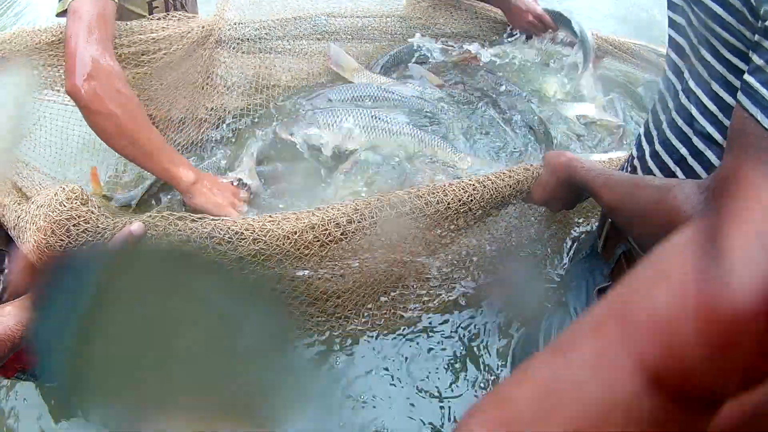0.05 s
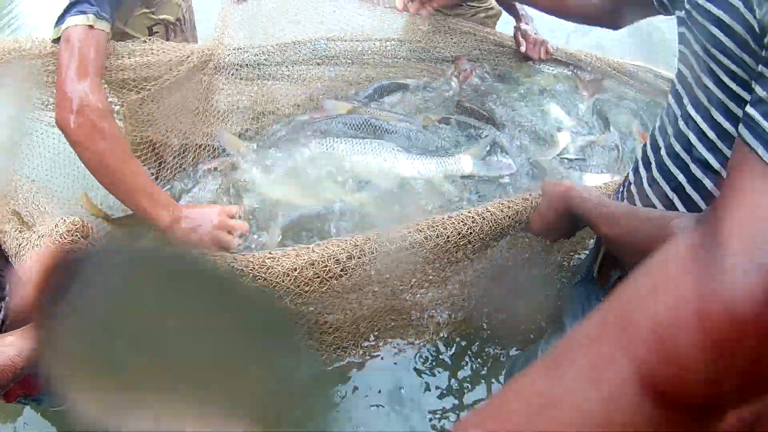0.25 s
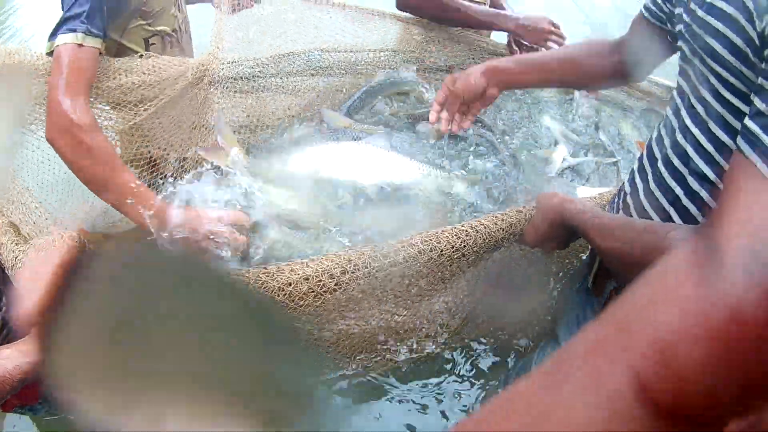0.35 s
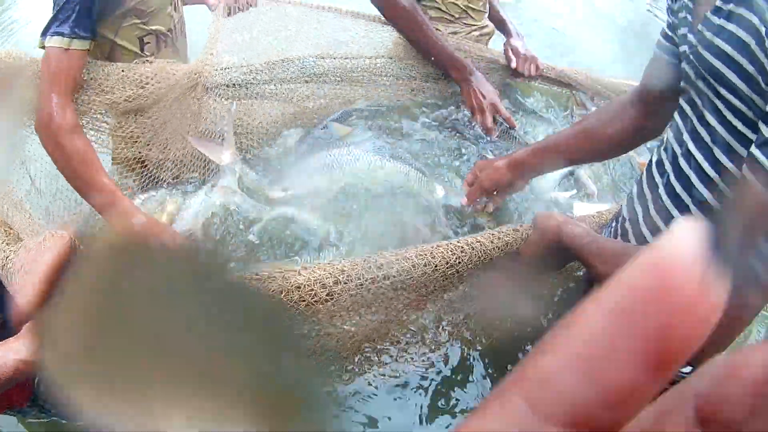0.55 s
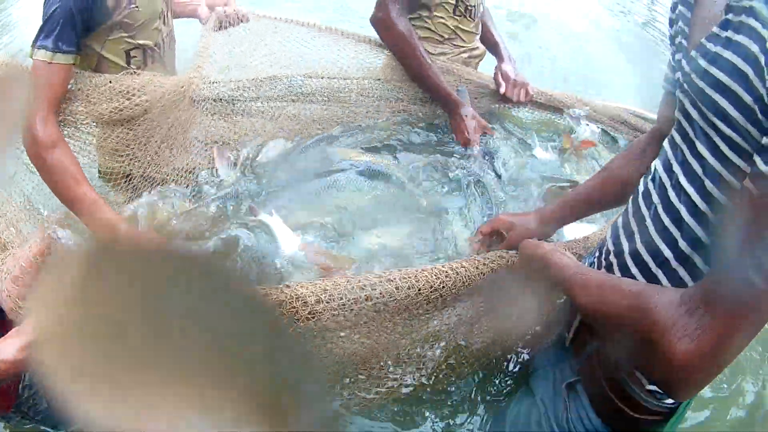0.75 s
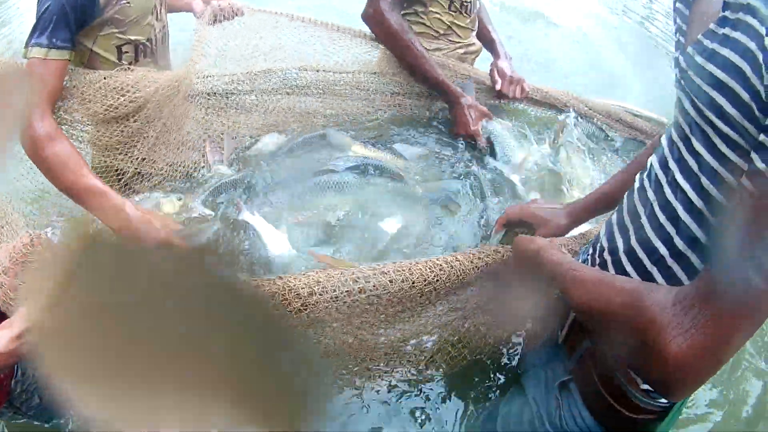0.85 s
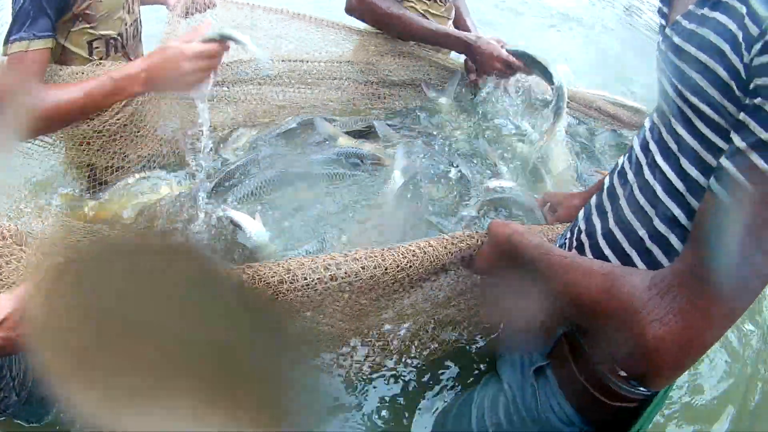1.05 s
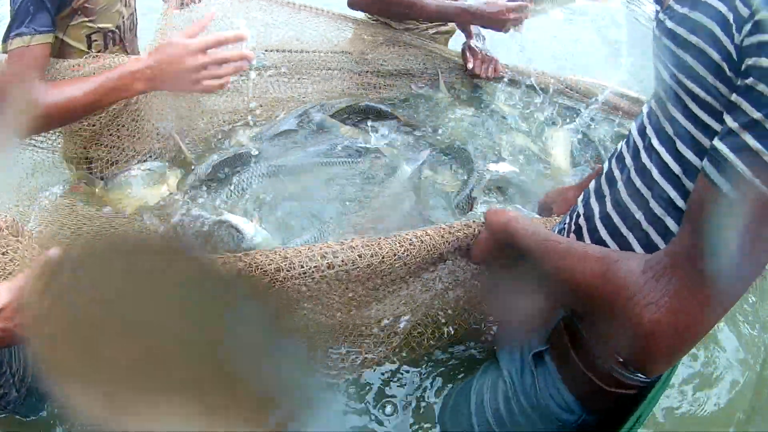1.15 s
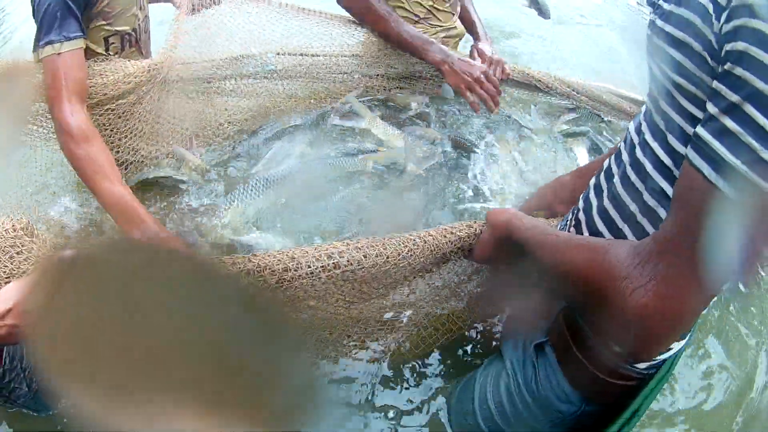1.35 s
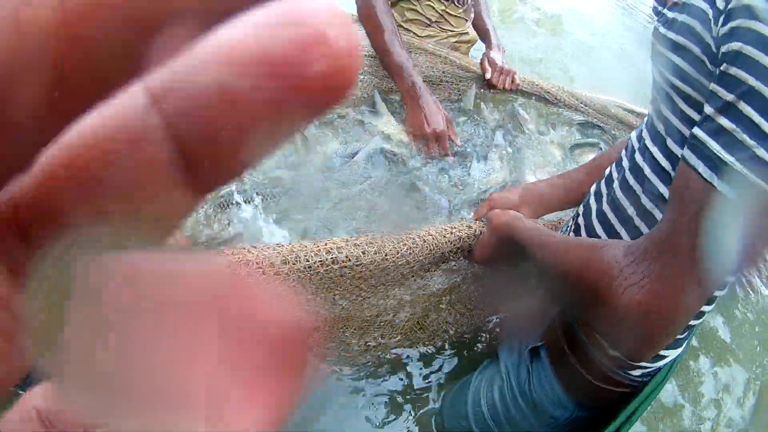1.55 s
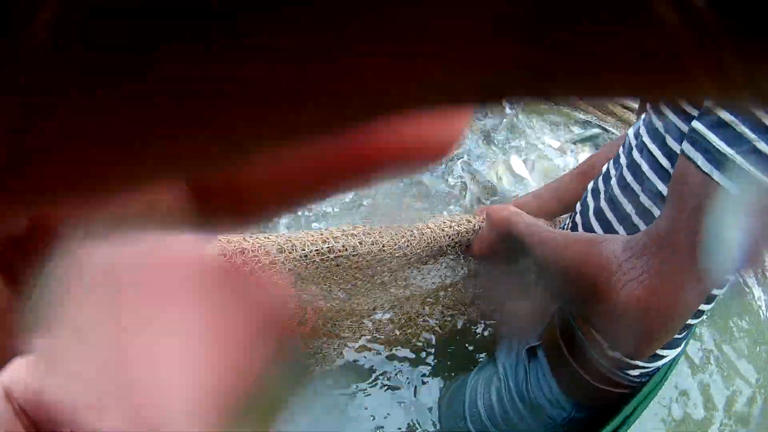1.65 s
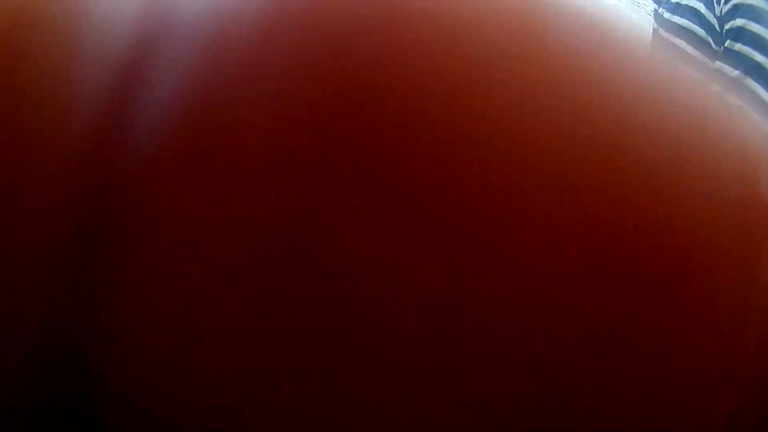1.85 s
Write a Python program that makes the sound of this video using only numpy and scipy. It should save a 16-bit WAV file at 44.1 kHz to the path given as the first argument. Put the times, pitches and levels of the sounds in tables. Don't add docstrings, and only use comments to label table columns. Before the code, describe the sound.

Hard hollow knocks on a camera's plastic case, with fish splashing faint and muffled behind

```python
import sys
import numpy as np
from scipy import signal
from scipy.fft import rfft, irfft
from scipy.io import wavfile
from scipy.ndimage import uniform_filter1d

SR = 44100
rng = np.random.default_rng(int(sys.argv[2]) if len(sys.argv) > 2 else 0)


def gain_from_db(level_db):
    decades = np.asarray(level_db, float) / 20
    return 10 ** decades


def wav_record(signal):
    frames = np.transpose(np.atleast_2d(signal))
    bounded = np.clip(frames, -1, 1)
    quanta = np.round(bounded * 32767).astype(np.int16)
    wavfile.write(sys.argv[1], SR, quanta)


N = 83790
T = np.arange(N) / SR

# centre_hz, width_hz, level_db
SHELL_WINDOWS = [(1380, 410, 2), (1500, 380, -2.5), (2270, 64, -7.5), (2870, 77, -7.5), (3340, 110, -4),
                 (4670, 210, -13), (6140, 310, -14)]


def unit(x):
    return x / np.sqrt(np.mean(x ** 2))


def curve(table):
    return gain_from_db(np.interp(T, *np.array(table).T[:2]))


def colour(x, table):
    hz, db = np.array(table).T
    f = np.maximum(np.fft.rfftfreq(N, 1 / SR), 1)
    gain = gain_from_db(np.interp(np.log(f), np.log(hz), db))
    return unit(irfft(rfft(x) * gain, N))


def band(x, hz, width):
    return signal.lfilter(*signal.iirpeak(hz, hz / width, SR), x)


def walk(rate):
    k = int(SR / rate)
    held = np.repeat(rng.standard_normal(N // k + 1), k)
    return 1.3 * uniform_filter1d(uniform_filter1d(held, k), k)[:N]


def add(out, s, x):
    i = int(s * SR)
    out[i:i + len(x)] += x[:N - i]


def ring(hz, t60, length, glide=0.):
    t = np.arange(int(length * SR)) / SR
    return np.sin(2 * np.pi * hz * t * (1 + glide * t / t60)) * np.exp(-np.log(1000) * t / t60)


def swell(s, rise_ms, fall_ms):
    late_ms = np.clip(T - s, -.1, .1) * 1e3
    rising = np.exp(np.minimum(-late_ms / rise_ms, 50))
    falling = np.exp(np.minimum(late_ms / fall_ms, 50))
    return 1 / (rising + falling)


def distant_bubbles():
    out = np.zeros(N)
    for when, size, fade, strength in rng.random((700, 4)):
        hz = 900 * 4.5 ** size
        bubble = ring(hz, (10 + 40 * fade) / hz, .04, 0.048)
        add(out, when * N / SR, gain_from_db(52 * strength - size) * bubble)
    return out


def near_bubbles():
    # start_s, level_db, pitch_hz
    plops = [(0.281, -40.5, 1013), (0.314, -46, 964), (0.685, -44.5, 1310), (0.699, -44.5, 1350),
             (0.733, -48.5, 1603), (0.753, -44, 1382), (0.788, -45.5, 2270), (0.808, -48.5, 1662),
             (0.954, -55, 1109), (1.211, -52, 1191), (1.289, -58, 3400), (1.592, -51.5, 1420),
             (1.664, -43.5, 1670), (.056, -45, 564), (.066, -46.5, 1260), (.29, -46.5, 1210),
             (.7, -52, 544), (1.825, -51, 1490), (1.884, -42, 2140)]
    # start_s, level_db, pitch_hz
    cluster = [
        (1.366, -40.5, 1528),
        (1.367, -39.5, 1860),
        (1.368, -35, 3380),
    ]
    out = np.zeros(N)
    for s, db, hz in list(plops) + list(cluster):
        bubble = ring(hz, 49 / hz, 0.029, 0.047)
        add(out, s, gain_from_db(db) * bubble * np.minimum(T[:len(bubble)] / 0.00098, 1))
    return out


def water():
    # start_s, level_db
    churn = [(0.0, -60.5), (0.084, -57.5), (0.75, -62.5), (1.254, -64), (1.81, -59.5), (1.9, -50)]
    # pitch_hz, level_db per Hz
    wash_colour = [(88, -27.5), (150, 3), (751, -8), (1210, -11.5), (2100, -12), (2290, -10.5),
                   (2490, -13.5), (3390, -16.5), (9000, -41), (11700, -66.5), (19800, -120)]
    # start_s, level_db, length_ms, loudest_octave (octaves above 1 kHz)
    slaps = [(0.059, -57, 1.6, 1.3), (.16, -73, 2.2, 1.1), (.295, -54.5, 2.3, 1.5), (.33, -53, 3.5, 1.48),
             (0.736, -63.5, 7.1, 1.8), (0.792, -59, 3.1, 1.23), (0.966, -66, 3.1, 2.35),
             (.98, -61, 2.6, 1.17), (1.03, -51, 2.47, 1.22), (1.25, -61, 5.3, 1.46),
             (1.294, -66, 2.34, 1.7), (1.345, -57, 4.2, 1.45), (1.369, -52.5, 2.66, 1.7),
             (1.468, -60, 2.7, 1.8), (1.489, -52.5, 4.4, 1.24), (1.652, -59.5, 8.8, 1.76),
             (1.744, -64.5, 2.8, 1.65), (1.06, -69, 3.4, 3), (1.189, -63, 1.76, 1.37),
             (1.357, -66, 1.9, 2.6), (1.39, -62, 2, 1.75), (1.402, -66.5, 1.86, 2.2),
             (1.478, -62.5, 2.4, 2.7), (1.592, -69.5, 2.3, 1.9), (1.668, -66, 2, 2), (1.683, -61.5, 2.5, 2),
             (.81, -60.5, 2.5, 1.8), (.195, -70, 2.6, 1.4), (.002, -51.5, 3.5, 1.54)]
    slap_spread, spray_db, spray_hz = 0.47, -5, 3560

    bubbles = distant_bubbles()
    slosh = walk(45)
    clumps, near = 0, np.zeros(N)
    for hz, width, db in SHELL_WINDOWS:
        narrow = unit(band(band(rng.standard_normal(N), hz, width), hz, 3 * width))
        steady = narrow * gain_from_db(db) * np.sqrt(width / 200)
        flicker_db = 9.9 * np.tanh(.6 * slosh + 0.75 * walk(70))
        clumps = clumps + steady * gain_from_db(flicker_db)
        for s, slap_db, ms, octave in slaps:
            off_pitch = (np.log2(hz / 1e3) - octave) / slap_spread
            near += steady * gain_from_db(slap_db - db / 2 - 4.0 * off_pitch ** 2) * 2 * swell(s, ms / 2, ms)

    spray = unit(band(rng.standard_normal(N), spray_hz, spray_hz))
    bursts = sum(gain_from_db(db) * swell(s, ms / 4, ms / 2) for s, db, ms, octave in slaps)
    near += gain_from_db(spray_db) * spray * bursts
    wash = colour(rng.standard_normal(N) * gain_from_db(0.61 * slosh), wash_colour)
    bed = gain_from_db(-6.5) * unit(bubbles) + gain_from_db(-5.5) * unit(clumps) + gain_from_db(-0.5) * wash
    return curve(churn) * bed + near + near_bubbles()


def sway():
    # start_s, level_db
    sway_level = [(0.0, -45.5), (0.126, -45.5), (0.322, -44), (0.39, -37.5), (0.492, -46.5), (0.798, -58),
                  (1.206, -56.5), (1.618, -57), (1.814, -54), (1.9, -40)]
    rumble = [(8, 0.0), (25, 2.5), (60, -5.5), (120, -11.5), (220, -30), (600, -56.5)]  # pitch_hz, level_db
    return curve(sway_level) * colour(rng.standard_normal(N), rumble)


def shoves():
    # start_s, direction (signed factor), level_db, rise_ms, fall_ms
    air_shoves = [(.02885, 1, -6, 0.29, 0.061), (0.033, 0.045, -15, 7.8, 0.47),
                  (0.1204, -1.03, -16, 0.12, 0.3), (0.1207, 0.93, -13.5, 0.11, 1.6),
                  (0.1223, 1, -12.5, 0.48, 2.9), (.131, -1.8, -32.5, 0.21, 0.36),
                  (0.23045, -0.8, 10.5, 0.68, 0.04), (0.2305, 0.73, 3, 0.03, 3.9),
                  (.4152, .5, -16.5, .4, 1.5), (0.4185, 0.65, 14, 0.89, 0.19), (0.4202, -0.7, 6, 0.3, 0.15),
                  (0.421, -1, -1, 1.4, 2.8), (0.434, 0.87, -11, 2.5, 6), (0.443, 1, -4, 3.5, 2.6),
                  (0.4642, -1.21, -12, 0.38, 3.4), (0.5232, -1.8, -20.5, 0.19, 0.58),
                  (.595, 0.7, -30.5, 1.1, 1.8), (1.645, -1.1, -31.5, .6, .9), (1.657, 1, -27, 2.06, 4.4),
                  (1.666, -0.96, -18.5, 2.37, 4.6), (1.799, 1, -37, 1.7, 7.8),
                  (1.833, -1.1, -34, 0.96, 0.53), (1.8637, 0.71, -21, 1.65, 0.43),
                  (1.865, -1, -27, 0.44, 1.3), (1.88, 0.87, -24, 2.5, .6), (1.8965, -1.2, -27, 1.5, 0.55),
                  (1.899, 0.91, -26, 0.41, 0.77)]
    return sum(way * gain_from_db(db) * swell(s, rise, fall) for s, way, db, rise, fall in air_shoves)


def knocks():
    # pitch_hz, direction (sign), level_db, t60_s
    hard_knocks = [
        (.02888, [(1111, -1, -21.6, .0206), (1338, -1, -12.5, .015), (1867, -1, -19, .0187), (2550, -1, -27, .009), (3186, -1, -25, .011), (4830, 1, -33, .011)]),
        (.2299, [(558, 1, -1.6, .0174), (811, -1, -2.5, .0176), (1155, -1, 3, .005), (1380, -1, -4, .014), (1749, 1, -9, .016), (1670, 1, -30, .06), (2062, -1, -16, .018), (2720, -1, 0, .0045), (3800, 1, -14, .006)]),
        (.4208, [(660, 1, -17, .013), (880, 1, -17, .012), (2100, 1, -27, .016), (3000, -1, -30, .01)]),
        (.4381, [(1830, 1, -34, .025)]),
        (.4626, [(986, -1, -22.5, .0072), (1351, 1, -19.5, .011), (2210, 1, -24, .016), (3100, -1, -36, .008), (4400, -1, -32, .008), (5300, 1, -38, .006)]),
        (.523, [(794, 1, -26, .035), (1288, -1, -36.6, .0136), (1860, -1, -32, .006), (2418, -1, -32, .004)]),
    ]
    out = np.zeros(N)
    for s, modes in hard_knocks:
        body = sum(way * gain_from_db(db) * ring(hz, t60, 0.059) for hz, way, db, t60 in modes)
        add(out, s, body * np.minimum(T[:len(body)] / .0003, 1))
    return out


def taps():
    # start_s, peak_db, favoured_octave (octaves above 1 kHz), spread_octaves, rattle_ms
    shell_taps = [(0.0293, -31, 3.5, 1.04, 2.5), (.1028, -33.5, 1.5, 1.43, 1.1),
                  (0.1197, -33, 1.2, 1.27, 0.69), (0.1298, -33, 1, 1.14, 0.36),
                  (0.2311, -20, 2.5, 0.46, 0.28), (.2500, -38.5, 2, 1.1, 0.5),
                  (0.2543, -46.5, 2, 0.9, 0.46), (.39, -54, -1, 0.53, 1.1), (0.419, -21, 2, 0.71, 0.53),
                  (0.4168, -32.5, 2.5, 0.34, 0.4), (.4262, -42, 2, 0.3, 0.98), (0.4342, -39, 1.3, 0.97, .8),
                  (0.4373, -29.5, 1.5, 0.86, .8), (.455, -38.5, 2, 1.7, 3.8), (0.4612, -36.5, 2, 1.1, 0.86),
                  (0.5231, -32, -0.6, 1.25, 1.3), (1.643, -44.5, 1.3, 1.55, 0.73),
                  (1.652, -38.5, 0.6, 1.6, 0.64), (.1255, -47.5, 1.8, 1.3, 0.41),
                  (0.4466, -51, 2.5, .8, .5), (.4588, -41.5, 2.3, .8, 1.03)]
    # pitch_hz, level_db, t60_s
    shell_modes = [(616, -2, 0.034), (810, 3, 0.023), (1030, -16, 0.022), (1352, 7, 0.028),
                   (1810, -6, 0.04), (2000, -5, .02), (2335, -11.5, 0.013), (2800, -13.5, .012),
                   (3778, -11.5, 0.01), (4160, -11.5, 0.014), (4530, -14.5, .01), (5850, -5, 0.0057),
                   (7340, -23.5, 0.0032), (11415, -26, 0.0043)]
    scatter_db, contact_s, rattle_db, off_spot_db = 5.5, 0.0001, -7.5, 15
    out, t = np.zeros(N), np.arange(500) / SR
    chance = rng.standard_normal((len(shell_taps), len(shell_modes) + len(t)))
    for (s, peak_db, octave, spread, ms), luck in zip(shell_taps, chance):
        rattle = luck[-len(t):] * np.exp(-t * 1e3 / ms) / np.sqrt(ms * SR / 2900.0)
        push = gain_from_db(rattle_db) * rattle + (t == 0)
        body = 0
        for k, (hz, db, t60) in enumerate(shell_modes):
            off_spot = 6 * ((np.log2(hz / 1e3) - octave) / spread) ** 2
            gain = gain_from_db(db + scatter_db * luck[k] - min(off_spot, off_spot_db))
            body = body + (-1) ** k * gain * ring(hz, t60, .05)
        soft = 1 - np.exp(-(T[:len(body)] / contact_s) ** 2)
        hit = np.convolve(push, body * soft)
        add(out, s, gain_from_db(peak_db) * hit / np.abs(hit).max())
    return out


def ticks():
    # start_s, level_db
    droplets = [
        (.103, -58),
        (.111, -48),
        (.131, -56),
        (.158, -48),
        (0.437, -41),
        (0.462, -44.5),
    ]
    out, tick = np.zeros(N), ring(11500, .006, .01)
    for s, db in droplets:
        add(out, s, gain_from_db(db) * tick * np.minimum(T[:len(tick)] / .0004, 1))
    return out


def mount():
    # pitch_hz, level_db, t60_s
    mount_modes = [(437, -50.5, .8), (667, -48.5, 0.7)]
    # start_s, level_db
    mount_blows = [
        (.231, 2.5),
        (0.421, 1),
    ]
    out = np.zeros(N)
    hum = sum(gain_from_db(db) * ring(hz, t60, 1.) for hz, db, t60 in mount_modes)
    for s, db in mount_blows:
        add(out, s, gain_from_db(db) * hum)
    return out


def rub():
    # start_s, level_db
    rub_level = [(1.62, -89), (1.65, -61.5), (1.69, -69.5), (1.785, -81), (1.802, -57), (1.865, -43),
                 (1.9, -52)]
    # pitch_hz, level_db per Hz
    rub_colour = [(35, -32), (60, -11), (250, -6), (791, -19.5), (1290, -19), (2110, -19), (2390, -28.5),
                  (5880, -31), (7500, -41.5), (8100, -59.5), (10400, -82), (17600, -120)]
    grains = rng.standard_normal(N)
    grain_db = np.minimum(1.7 * rng.exponential(size=N), 14) + 2.1 * walk(150)
    slips = grains * gain_from_db(grain_db)
    rung = sum(gain_from_db(db / 2) * band(slips, hz, width) for hz, width, db in SHELL_WINDOWS)
    return curve(rub_level) * colour(unit(slips) + gain_from_db(-9.5) * unit(rung), rub_colour)


def scene():
    blows = shoves() + knocks() + taps() + mount() + ticks()
    return (blows + water() + sway() + rub())[None]


def band_limit(x):
    return signal.sosfilt(signal.butter(12, 16064, fs=SR, output="sos"), x)


def record(dry):
    port_hz, seal_hz, coupling_hz, top_hz = 20, 7200, 9, 16000
    hiss_db, ceiling = -76, 0.92
    x = signal.lfilter(*signal.butter(1, port_hz, "high", fs=SR), dry)
    x = signal.lfilter(*signal.butter(2, seal_hz, fs=SR), x)
    x = x + gain_from_db(hiss_db - 2) * rng.standard_normal(dry.shape)
    x = np.clip(x, -ceiling, ceiling)
    x = signal.lfilter(*signal.butter(1, coupling_hz, "high", fs=SR), x)
    x = signal.sosfilt(signal.ellip(10, .2, 60, top_hz, fs=SR, output="sos"), x)
    mix = np.clip(x, -1, 1)
    return band_limit(mix)


dry = scene()
out = record(dry)
wav_record(out)
```